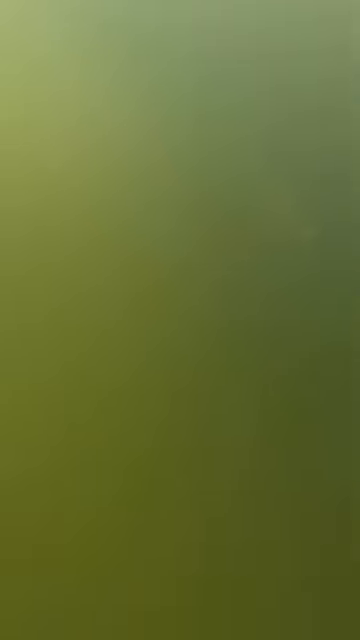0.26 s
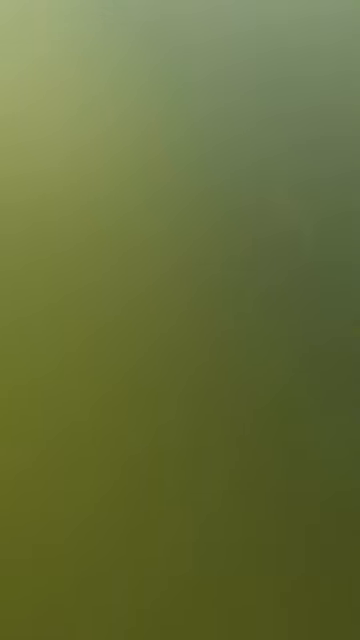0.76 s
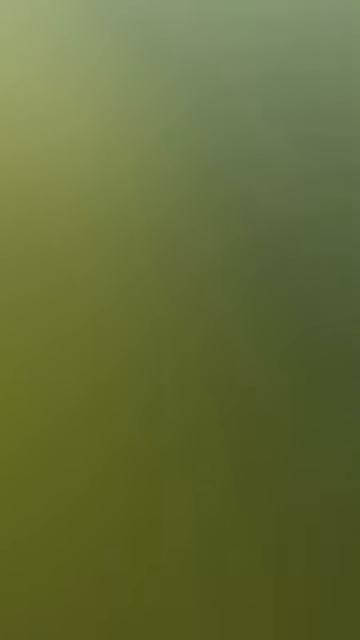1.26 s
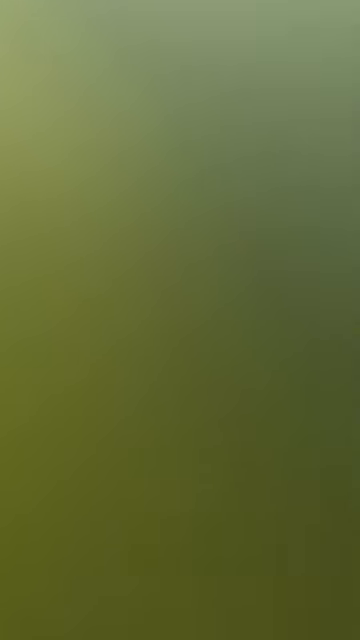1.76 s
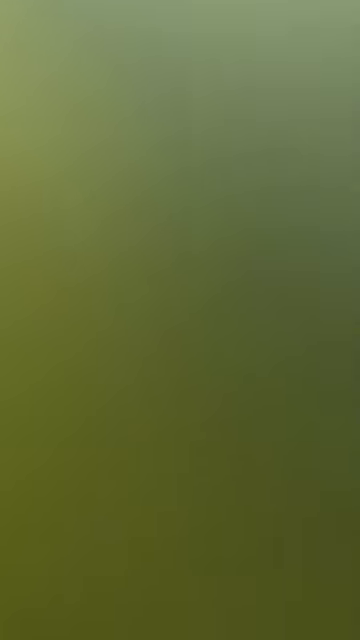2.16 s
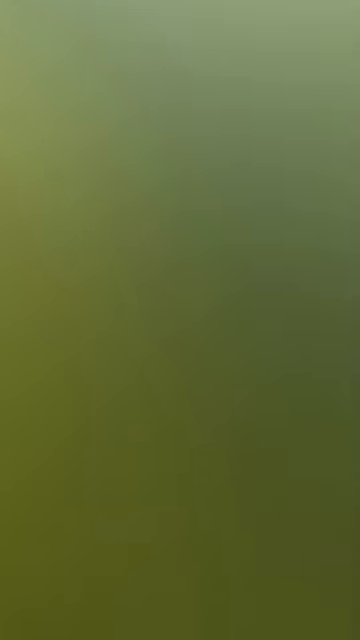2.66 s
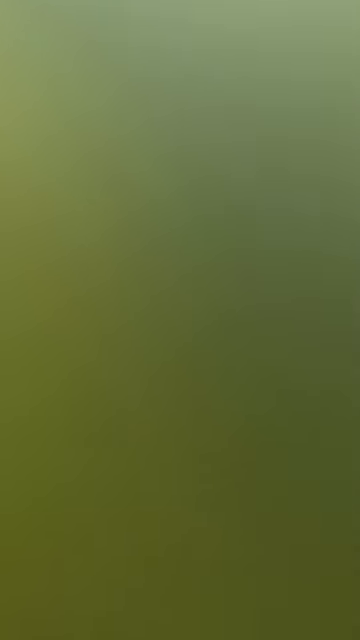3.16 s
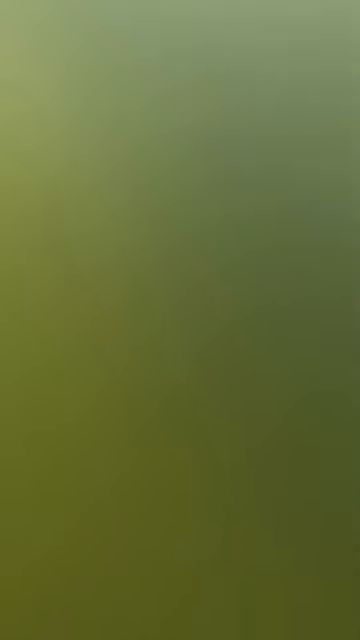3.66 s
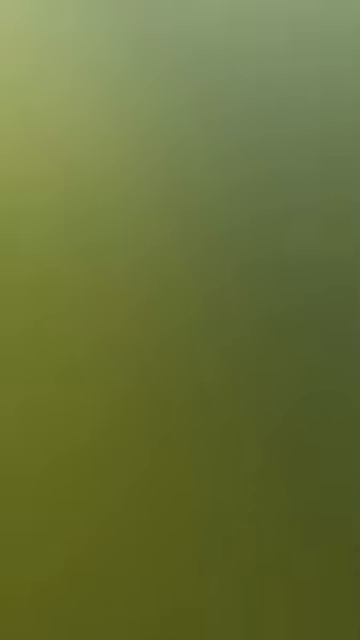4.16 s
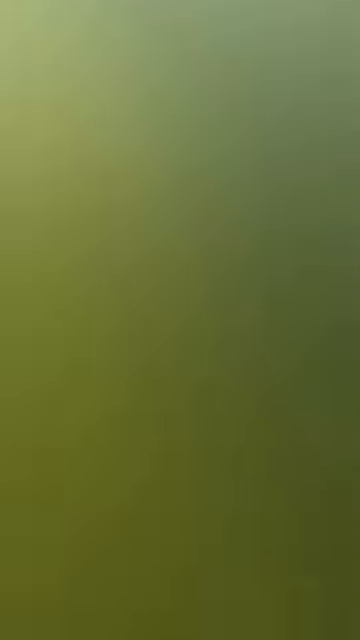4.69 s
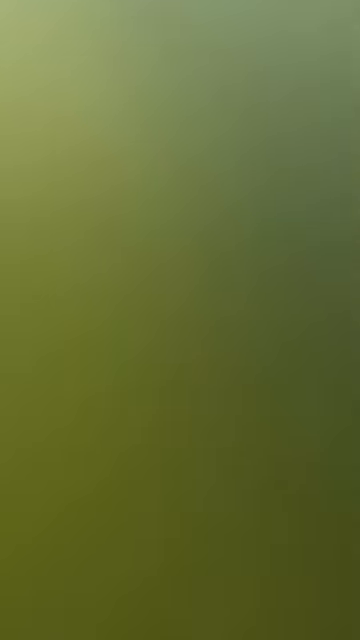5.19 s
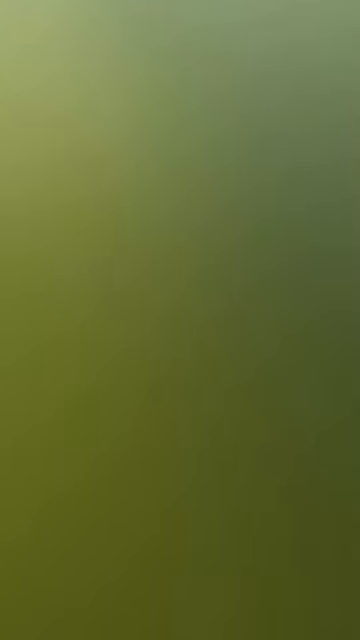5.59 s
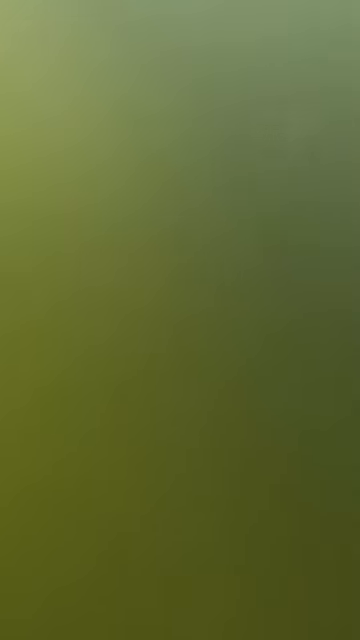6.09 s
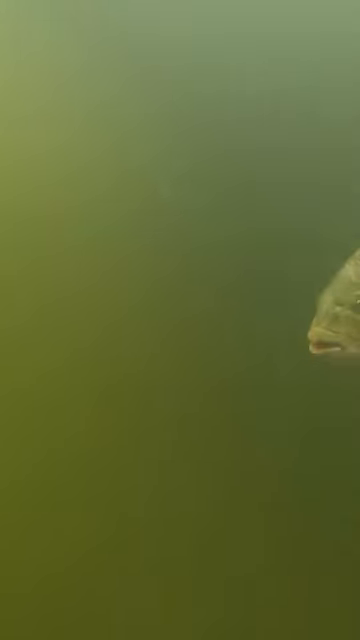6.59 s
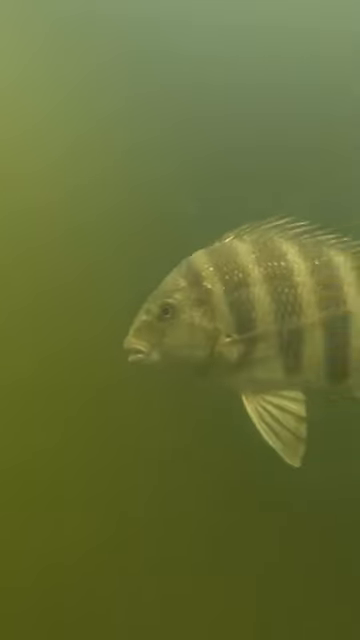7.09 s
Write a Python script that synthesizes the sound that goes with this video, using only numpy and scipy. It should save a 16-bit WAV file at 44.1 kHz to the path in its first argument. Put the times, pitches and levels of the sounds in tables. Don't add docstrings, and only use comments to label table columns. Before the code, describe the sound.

A sealed housing hangs in murky water, heard from within. Throughout there is soft broadband hiss, fine distant crackle, dull low rumble, a barely audible high whine and a hollow hum near 410 Hz that wavers and weakens. Quick knocks and a sharp snap open the scene; a strong hollow knock lands at 0.5 s. Faint, rough, pulsing fish grunts come at about 0.35, 0.8, 1.6 and 2.25 s. More snaps at 1.05 and 1.2 s, and a firm knock at 1.36 s. From 1.9 to 2.1 s the mount gives loud dry pops and brief rubbing as slow pressure surges, then ticks. At 2.45-2.5 s a soft thump bounces with knocks and a pop. Smaller knocks, tiny fizzes and ticks thin out after 3 s. Clearer snaps return around 4.8 and 5.0 s, a knock at 5.3 s, then sparse snaps at 6.2, 6.8 and 7.15 s over the quiet hum until the end.

```python
import sys
import numpy as np
from scipy import signal
from scipy.fft import rfft, irfft, next_fast_len
from scipy.io import wavfile
from scipy.ndimage import uniform_filter1d

SR = 44100
rng = np.random.default_rng(int(sys.argv[2]) if len(sys.argv) > 2 else 0)


def boost_factor(decibels):
    exponent = np.asarray(decibels, float) / 20
    return 10 ** exponent


def transcribe(signal):
    frames = np.atleast_2d(signal).T
    limited = np.clip(frames, -1, 1)
    pcm = np.round(limited * 32767).astype(np.int16)
    wavfile.write(sys.argv[1], SR, pcm)


N = 323694

# (frequency [Hz], level [dB])
SNAP_SPECTRUM = [(900, -49), (2200, -8.5), (3200, -8.5), (3900, -7.5), (5600, -6.5), (7200, -6.5),
                 (8400, -14.5), (11500, -23), (14800, -31.5)]
# (frequency [Hz], phase [rad])
PORT_LEAD = [(0, 0), (520, 0.0), (780, -1.63), (1460, -0.79), (1720, -0.84), (2240, -1.12), (2760, -1.1),
             (3010, -0.94), (3530, -0.41), (4050, -0.7), (4390, -0.5), (4820, -0.73), (6370, 0.28),
             (14900, 0.18)]
# (frequency [Hz], level [dB])
PORT_TILT = [(60, -1.5), (110, 1), (200, -6), (380, 2), (690, -5), (1280, 2), (2350, 2.5), (4330, -2.5),
             (7980, 0.5), (14700, 2.5)]


def evened(x):
    return x / np.sqrt(np.mean(x ** 2) + 1e-20)


def read(points, hz):
    f, value = np.transpose(points)
    return np.interp(np.log(hz + 1), np.log(f + 1), value)


def add(mix, s, sound):
    part = mix[round(s * SR):][:len(sound)]
    part += sound[:len(part)]


def band(x, low, high, order=2):
    return signal.sosfilt(signal.butter(order, [low, high], "band", fs=SR, output="sos"), x)


def resonate(x, hz, width):
    return signal.lfilter(*signal.iirpeak(hz, hz / max(width, 1), SR), x)


def ring(db, hz, t60, rise):
    t = np.arange(SR // 4) / SR
    decay = boost_factor(-60 * t / np.clip(t60, .004, .6))
    shape = decay * (1 - np.exp(-t / max(rise, 1e-4))) ** 2
    return boost_factor(db) * shape / shape.max() * np.sin(2 * np.pi * hz * t)


def causal(points):
    log_gain = read(points, np.fft.rfftfreq(2048, 1 / SR)) * np.log(10) / 20
    circle = np.r_[log_gain, log_gain[-2:0:-1]]
    return np.fft.ifft(np.exp(np.conj(signal.hilbert(circle)))).real[:1024]


def ports(x):
    size = next_fast_len(N)
    hz = np.fft.rfftfreq(size, 1 / SR)
    half = boost_factor(read(PORT_TILT, hz) / 2) * np.exp(.5j * 0.95 * read(PORT_LEAD, hz))
    return irfft(rfft(x, size) * np.array([half, 1 / half]), size)[:, :N]


def wash(magnitude, patchy_db, size):
    # (frequency [Hz], coherence [0-1])
    likeness = [(60, 0.56), (130, 0.58), (290, 0.56), (630, 0.52), (1390, 0.79), (3050, 0.44), (5000, 0.91),
                (6700, 0.89), (14700, 0.78)]
    hop = size // 4
    hz = np.fft.rfftfreq(size, 1 / SR)
    a, b, c, d, patches = rng.standard_normal((N // hop + 5, len(hz), 5)).T
    patches = uniform_filter1d(patches, size=3000 // hop, axis=1)
    patches = evened(uniform_filter1d(patches, size=size // 100, axis=0))
    same = np.clip(read(likeness, hz), 0, 1)[:, None]
    left, other = a + 1j * b, c + 1j * d
    half = (boost_factor(read(PORT_TILT, hz) / 2) * np.exp(.5j * read(PORT_LEAD, hz)))[:, None]
    z = np.array([left * half, (same * left + np.sqrt(1 - same ** 2) * other) / half])
    z *= magnitude(hz)[:, None] * boost_factor(patchy_db * patches.clip(-2, 2))
    return signal.istft(z, nperseg=size, noverlap=size - hop)[1][:, :N]


def hiss():
    # (frequency [Hz], density [dB per Hz])
    water = [(900, -10), (1700, -8), (2500, -8), (4100, -15), (4800, -15.5), (6500, -7), (7600, -14),
             (8100, -19.5), (9300, -20.5), (11200, -26), (12600, -25), (13100, -30), (14600, -31.5),
             (15300, -36)]
    # (frequency [Hz], width [Hz], level [dB])
    shell_modes = [
        (1410, 200, -3),
        (2028, 500, -1),
        (3160, 670, -2.5),
        (4500, 90, -5),
        (5434, 950, -3),
        (8700, 120, -16),
        (10500, 140, -26),
    ]

    def colour(hz):
        peaks = sum(boost_factor(db) ** 2 / (1 + (2 * (hz - f) / w) ** 2) ** 2 for f, w, db in shell_modes)
        return np.sqrt(boost_factor(read(water, hz)) ** 2 + peaks) * (hz > 800)
    return boost_factor(-67.5) * evened(wash(colour, patchy_db=1.83, size=1024))


def murk():
    # (frequency [Hz], density [dB per Hz])
    low_water = [(8.8, -29), (15, 0.5), (36, -9), (92, -23), (158, -14), (281, -20.5), (342, -18.5),
                 (409, -12.5), (536, -27.5), (903, -33.5), (1100, -49), (1430, -66), (2420, -120)]
    low = wash(lambda hz: boost_factor(read(low_water, hz)) * (hz > 12) * (hz < 1100), patchy_db=3.5, size=4096)
    upper = band(low, 500, 1100, order=4)
    return boost_factor(-75) * low / np.std(upper)


def sway():
    # (time [s], peak level [dB])
    surge_table = [(0.0, -50), (0.35, -47), (0.6, -44.5), (1.12, -44), (1.36, -41), (1.76, -40),
                   (2.06, -34.5), (2.3, -40), (2.45, -42), (3.1, -47), (3.68, -43), (4.66, -45),
                   (5.42, -47), (6.33, -46), (6.0, -46), (6.9, -45), (7.11, -47.5)]
    rise_db_per_s, fall_db_per_s, calm_db = 50, 75, -70
    noise = rng.standard_normal((3, N + SR))
    drift = evened(band(noise[:2], 2.5, 9.0)[:, SR:])
    eddies = evened(band(noise[2], 15.0, 45.0)[SR:])
    t = np.arange(N) / SR
    surges = [db - np.maximum(rise_db_per_s * (s - t), fall_db_per_s * (t - s)) for s, db in surge_table]
    strength = boost_factor(np.maximum(np.max(surges, axis=0), calm_db))
    apart = 0.063 * np.array([drift[1], -drift[1]])
    return strength * (drift[0] + boost_factor(-18.5) * eddies + apart)


def hum():
    # (time [s], level [dB])
    work = [(0.0, -56), (0.57, -61), (1.1, -63), (1.25, -63), (1.4, -58), (2.23, -62.5), (2.66, -63),
            (3.07, -63), (3.33, -64), (3.78, -60), (4.05, -62), (4.6, -63), (5.03, -67), (5.3, -62),
            (5.64, -65), (5.95, -71), (6.45, -71), (6.64, -66), (6.99, -65), (7.34, -63)]
    t = np.arange(N) / SR
    hits = rng.random((2, N)) < 90 / SR
    strength = .14 + hits * boost_factor(3.0 * rng.exponential(1, (2, N)).clip(0, 4))
    nudges = rng.standard_normal((2, N)) * strength
    wander = uniform_filter1d(rng.standard_normal(N), size=1500)
    wander = evened(uniform_filter1d(wander, size=1500))
    held = np.sqrt(2) * np.sin(2 * np.pi * np.cumsum(408 + 7.0 * wander) / SR)
    air = evened(resonate(resonate(nudges[0], 411.1, 22), 375, 150)) + 0.88 * held
    case = resonate(resonate(nudges[1], 162.7, 45), 189, 120)
    work_db = np.interp(t, *np.transpose(work))
    case_db = -61.5 + 0.64 * (work_db - work_db.mean()) - 1.55 * t
    return boost_factor(work_db - .6) * air + boost_factor(case_db) * evened(case)


def whine():
    # (frequency [Hz], rms level [dB])
    tones = [
        (4495.6, -91),
        (8991, -97.5),
    ]
    t = np.arange(N) / SR
    pulsing = 1 + 1.3 * np.cos(2 * np.pi * 29.97 * t)
    return pulsing * sum(boost_factor(db) * np.sqrt(2) * np.sin(2 * np.pi * (hz * t + rng.random()))
                         for hz, db in tones)


def crackle():
    size = boost_factor(4 * rng.exponential(1, N).clip(0, 2.5)) * (rng.random(N) < 70 / SR)
    t = np.arange(400) / SR
    spread = signal.oaconvolve(size, boost_factor(-60 * t / 0.014))[:N] * rng.standard_normal(N)
    coloured = signal.oaconvolve(spread, causal(SNAP_SPECTRUM))[:N]
    return boost_factor(-79.5) * evened(resonate(coloured, 5000, 6000))


def knocks():
    # (time [s], peak level [dB], frequency [Hz], t60 [s])
    air_knocks = [(0.028, -45, 406, 0.17), (0.043, -35, 410, 0.08), (0.073, -36, 415, 0.17),
                  (0.5053, -26, 401, 0.099), (0.689, -46, 395, 0.12), (0.747, -40.5, 416, 0.073),
                  (1.292, -40, 396, 0.11), (1.319, -34.5, 400, 0.17), (1.361, -27.5, 411.8, 0.16),
                  (1.492, -45.5, 405, 0.12), (2.4607, -31, 410, 0.05), (2.716, -48.5, 415, 0.16),
                  (2.749, -46.5, 394, 0.058), (2.902, -48, 381, 0.072), (2.97, -52, 404, 0.056),
                  (3.139, -47, 393, 0.056), (3.465, -45.5, 409, 0.071), (3.51, -46, 407.6, 0.15),
                  (3.714, -45, 400, 0.074), (3.815, -45, 399, 0.13), (3.982, -44.5, 425, 0.15),
                  (4.333, -53, 388, 0.11), (5.18, -43, 403, 0.11), (5.23, -51.5, 397, 0.15),
                  (5.31, -36, 395.3, 0.15), (6.152, -49.5, 410, 0.067), (6.21, -53, 418, 0.1),
                  (6.987, -54, 408, 0.14), (7.169, -51, 409, 0.12), (2.873, -54, 390, .1),
                  (3.02, -53, 390, .1), (3.065, -54, 390, .12), (3.276, -51, 412, .15),
                  (3.548, -53, 406, .1), (3.783, -51, 404, .1), (3.938, -51, 404, .1),
                  (4.452, -57, 415, .1), (4.489, -55, 404, .1), (4.586, -54, 395, .1),
                  (4.931, -53, 417, .12), (5.265, -51, 406, .08), (5.647, -54, 415, .1),
                  (5.694, -57, 415, .1), (5.736, -55, 420, .1), (6.271, -56, 406, .1),
                  (6.504, -56, 406, .15), (6.6, -58, 420, .1), (6.828, -52, 417, .12),
                  (7.207, -53, 405, .1), (7.264, -50, 415, .12)]
    # (time [s], peak level [dB])
    soft_nudges = [(0.2, -48), (0.826, -43.5), (0.31, -51), (0.972, -52), (0.997, -52), (1.108, -51),
                   (2.275, -53), (2.36, -56), (4.145, -51), (4.67, -52), (4.765, -56), (4.85, -57),
                   (1.645, -46.5), (2.042, -54), (3.23, -53.5), (3.619, -47), (4.208, -47.5), (5.123, -52),
                   (7.307, -52)]
    # (time [s], peak level [dB], frequency [Hz], t60 [s])
    case_thuds = [(.05, -50, 155, .15), (0.5, -30.5, 201, 0.047), (0.76, -51, 168.5, 0.13),
                  (2.529, -47, 102, 0.12), (2.587, -37, 151, 0.088), (2.716, -37, 146.5, 0.064),
                  (2.786, -48, 153, 0.1), (3.376, -54.5, 160, 0.1), (3.5, -56.5, 162, 0.16),
                  (4.042, -44.5, 158, 0.082), (4.154, -53, 159, 0.078), (4.291, -45.5, 140, 0.052),
                  (5.178, -55, 205, 0.057), (5.305, -43.5, 230, 0.09)]
    # (time [s], peak level [dB], frequency [Hz], t60 [s])
    further_rings = [(.04, -43, 328, 0.068), (.505, -36, 287, 0.068), (1.35, -57, 85, 0.12),
                     (2.01, -48, 60, 0.13), (2.452, -38.5, 150, .05), (2.471, -57, 720, 0.07),
                     (2.4705, -24, 420, 0.075), (2.4907, -32.5, 375, 0.08), (3.985, -46.5, 316, 0.05),
                     (4.29, -54, 83, .12), (5.311, -42.5, 333, 0.09), (5.33, -55, 468, 0.1)]
    out = np.zeros(N)
    for s, db, hz, t60 in air_knocks + [(*row, 409, 0.33) for row in soft_nudges]:
        add(out, s - .003, ring(db, hz, t60, 0.0041))
    for s, db, hz, t60 in case_thuds + further_rings:
        add(out, s, ring(db, hz, t60, .0025 + .45 / hz))
    return out


def snaps():
    # (time [s], peak level [dB], brightest frequency [Hz],
    # lid ring re snap [dB], wall ring re snap [dB])
    near_snaps = [(0.0584, -32, 7600, -19, -15), (0.22, -42.5, 7200, -3.5, -8),
                  (0.5198, -42, 7060, -16, -22), (0.658, -48.5, 3550, -1.5, -3.5),
                  (1.055, -45.5, 4400, -8, -4), (1.1868, -37, 5540, -2.5, -7.5),
                  (1.3541, -49, 6900, -12, -22), (1.417, -41, 4150, -3, -4),
                  (1.7125, -43.5, 7400, -17, -16), (1.779, -47, 6930, -31, -24),
                  (1.9824, -46, 4560, -11, -5), (2.234, -41, 4700, 0, -15), (2.3254, -38, 3940, -11, -12.5),
                  (3.0021, -44, 6970, -10, -20), (4.772, -49, 4680, -19, -13),
                  (4.8097, -41, 5800, -11, -10.5), (5.022, -36, 3820, -9, -7),
                  (5.3487, -44.5, 6960, -28, -20), (5.6037, -50, 7030, -22, -13),
                  (6.183, -42, 7550, -11, -5), (6.251, -50, 7100, -22, -17), (6.658, -48.5, 5900, -23, -12),
                  (6.836, -46, 4990, 2, 5.5), (7.1517, -39, 6970, -9.5, -10.5)]
    # (time [s], peak level [dB])
    far_snaps = [(0.0922, -51), (1.6671, -55), (1.8087, -53), (2.0336, -48.5), (2.3594, -56),
                 (2.7603, -56.5), (2.9194, -60), (4.03, -59), (4.9533, -53), (5.217, -50), (5.3644, -57),
                 (5.874, -53.5), (6.9894, -61), (7.1931, -59)]
    far_hz, far_lid_db, far_wall_db = 5370, -18, -13
    out, apart = np.zeros(N), np.zeros(N)
    t, colour = np.arange(2048) / SR, causal(SNAP_SPECTRUM)
    treble = signal.butter(2, 8500, "high", fs=SR, output="sos")
    rows = sorted(near_snaps + [(*row, far_hz, far_lid_db, far_wall_db) for row in far_snaps])
    grits = rng.standard_normal((len(rows), 2, 2048))
    for (s, db, hz, lid_db, wall_db), grit in zip(rows, grits):
        length = 1.08 * (far_hz / hz) ** 0.35
        direct, echoes = boost_factor(-60 * t / (0.017 * length)), boost_factor(-60 * t / (0.18 * length))
        rough = grit * (direct + 0.078 * echoes) * np.minimum(t / .0016, 1)
        burst, other = signal.fftconvolve(rough, colour[None])[:, :2048]
        shock = grit[0] * (direct + 0.085 * echoes) * np.minimum(t / 0.0019, 1)

        lid = evened(resonate(resonate(shock, 1515, 250), 1510, 600))
        lid = resonate(lid + 4.5 * ring(0, 1437.0, 0.037 * length, 0.0018)[:2048], 1530, 900)
        wall = resonate(resonate(shock, 2020, 170), 2010, 600)
        wall = wall + 0.72 * resonate(resonate(shock, 2730, 200), 2970, 600)

        top_gain = min((hz / 5100) ** 2.5, 1.4)
        burst = burst + (top_gain - 1) * signal.sosfiltfilt(treble, burst)
        bright = burst + 2.04 * (hz / 5500) ** 2 * resonate(burst, hz, 820)
        for part, part_db in [(bright, 0), (lid, lid_db), (wall, wall_db + 0.5)]:
            add(out, s, boost_factor(db + part_db) * part / abs(signal.hilbert(part)).max())
        add(apart, s, boost_factor(db - 12) * other / abs(other).max())
    return ports(out) + apart * np.array([[1], [-1]])


def ticks():
    # (time [s], peak level [dB], frequency [Hz])
    slip_table = [(.067, -54, 1420), (1.119, -57, 1450), (1.3, -62, 1430), (1.362, -58, 1400),
                  (2.134, -54, 1350), (2.146, -54, 1370), (2.174, -54, 1350), (2.209, -55, 1400),
                  (2.2425, -52, 1420), (2.291, -49, 1420), (2.3, -52, 1450), (2.898, -61, 1440),
                  (2.911, -59, 1430), (2.923, -61, 1420), (2.937, -62, 1420), (3.046, -63, 1430),
                  (3.072, -64, 1470), (3.112, -58, 1380), (3.129, -55, 1420), (3.139, -57, 1430),
                  (3.157, -61, 1430), (3.454, -63, 1480), (3.557, -57, 1460), (3.704, -63, 1400),
                  (3.794, -60, 1420), (3.964, -60, 1470), (4.605, -63, 1390), (4.705, -60, 2740),
                  (7.164, -56, 1430), (7.257, -60, 1400), (7.276, -60, 1380), (7.317, -58, 1500)]
    out = np.zeros(N)
    for s, db, hz in slip_table:
        add(out, s, ring(db, hz, .038, .0018) + ring(db - 9, 1.42 * hz, .03, .001))
    return out


def grunts():
    # (start [s], end [s], level [dB], pulse rate [1/s])
    calls = [
        (0.339, .47, -75, 81),
        (0.774, 1.0, -73, 77),
        (1.62, 1.86, -73.5, 66),
        (2.241, 2.44, -75.5, 79),
    ]
    out = np.zeros(N)
    for start, end, db, per_s in calls:
        jitter, size, pitch = rng.standard_normal((40, 3)).T
        times = start - .015 + np.cumsum((1 + .2 * jitter) / per_s)
        for s, size_db, hz in zip(times, 2.5 * size, 780 * (1 + .06 * pitch)):
            if s < end:
                swell_db = db + size_db - 7 * (2 * (s - start) / (end - start) - 1) ** 4
                upper = ring(swell_db + 9, hz, 0.048, .003)
                lower = ring(swell_db + 6.5, 0.767 * hz, 0.032, 0.0033)
                add(out, s, upper + lower)
    return out


def taps():
    # (time [s], peak level [dB], frequency [Hz])
    tap_table = [(0.5015, -48, 790), (1.417, -51.5, 760), (1.965, -54, 690), (1.973, -54.5, 830),
                 (2.033, -55, 670), (2.057, -58, 570), (2.446, -54, 556), (2.447, -55, 830),
                 (2.492, -60, 760), (3.714, -60, 614), (3.813, -59, 570), (3.979, -59, 830),
                 (5.189, -59, 619), (5.311, -61, 568)]
    t60 = .031
    out = np.zeros(N)
    for s, db, hz in tap_table:
        add(out, s, ring(db + 1, hz, t60, 0.0011) + ring(db - 7.0, 1.22 * hz, t60, 0.00073))
    return out


def fizz():
    # (time [s], peak level [dB])
    bubbles = [
        (1.338, -70),
        (2.3675, -65),
        (2.738, -70),
        (2.9108, -69),
        (2.9417, -67),
        (4.0128, -76),
        (4.0277, -66),
        (5.5927, -68),
        (7.3108, -70),
    ]
    out, t = np.zeros((2, N)), np.arange(1024) / SR
    treble = signal.butter(4, 9800, "high", fs=SR, output="sos")
    for (s, db), grit in zip(bubbles, rng.standard_normal((len(bubbles), 2, 1024))):
        envelope = boost_factor(db - 1 - 60 * t / .025) * np.minimum(t / .001, 1)
        burst = signal.sosfilt(treble, grit) * envelope
        add(out[0], s, burst[0] + .4 * burst[1])
        add(out[1], s, burst[0] - .4 * burst[1])
    return out


def rub():
    # (start [s], length [s], level [dB])
    stroke_table = [(1.36, .035, -69), (1.43, .035, -65), (1.98, .01, -62), (2.017, .012, -54.5),
                    (2.04, .03, -60), (2.138, .04, -67), (2.19, 0.075, -68), (2.284, 0.022, -62),
                    (2.471, 0.039, -61), (3.805, .02, -69), (3.97, .022, -70)]
    edge_db_per_s, creep_db = 901, -78
    slips = rng.standard_normal(N) * (.4 + (rng.random(N) < 700 / SR) * 3.0)
    t = np.arange(N) / SR
    strokes = np.zeros(N)
    for s, length, db in stroke_table:
        outside = np.maximum(np.maximum(s - t, t - s - length), 0)
        strokes += boost_factor(db - edge_db_per_s * outside)
    lid = resonate(resonate(slips, 1450, 310), 1380, 600)
    wall = resonate(resonate(slips, 1920, 260), 1990, 500)
    return np.maximum(strokes, boost_factor(creep_db)) * evened(lid + 0.6 * wall)


def pops():
    # (time [s], peak level [dB], frequency [Hz])
    pop_table = [(1.9056, -47, 1240), (1.9626, -33, 1320), (1.9704, -31.5, 1300), (2.0349, -25.5, 1390),
                 (2.0556, -29.5, 1340), (2.2484, -42, 1370), (2.4448, -33.5, 1350), (2.489, -41.5, 1320),
                 (3.5735, -51.5, 1280), (4.369, -59, 1340), (4.801, -52, 1380), (6.2751, -59, 1380),
                 (6.6787, -49, 1340), (6.7007, -61, 1400), (7.1744, -55, 1380)]
    out = np.zeros(N)
    for s, db, hz in pop_table:
        contact = max(0.0037 - .00014 * (db + 29.5), .001)
        t = np.arange(0, contact, 1 / SR)
        tone = np.sin(2 * np.pi * hz * 1.089 * t) + 0.035 * np.sin(2 * np.pi * 3050 * t)
        packet = boost_factor(db) * np.hanning(len(t)) * tone
        for delay, echo_db in [(-.0008, 0), (.0026, -14), (.0065, -22), (.011, -33)]:
            add(out, s + delay, boost_factor(echo_db) * packet)
    return out


def thump():
    # (time [s], level [dB], contact [s])
    bounces = [
        (2.4645, -12.8, 0.0068),
        (2.4812, -16.5, 0.0034),
        (2.494, -15, 0.0078),
        (2.504, -31, 0.007),
        (2.512, -24, .006),
    ]
    # (frequency [Hz], level [dB], t60 [s])
    case_modes = [
        (69, -14.5, .12),
        (121, 3, 0.065),
        (168.6, -2.5, 0.14),
        (202.2, 1.0, 0.075),
        (290, -10, .04),
    ]
    push, t = np.zeros(N), np.arange(SR // 4) / SR
    for s, db, contact in bounces:
        add(push, s, boost_factor(db) * np.hanning(round(contact * SR)))
    modes = sum(boost_factor(db - 60 * t / t60) * np.cos(2 * np.pi * hz * t) for hz, db, t60 in case_modes)
    held = np.clip((2.525 - np.arange(N) / SR) / 0.013, .12, 1)
    return boost_factor(-43.5) * signal.oaconvolve(push, modes)[:N] * held


def scene():
    shell = ports(hum() + crackle() + ticks() + grunts() + taps() + rub() + pops()) + snaps()
    rocking = (knocks() + thump()) * boost_factor([[.4], [-.4]])
    return shell + rocking + hiss() + murk() + sway() + whine() + fizz()


def band_limit(x):
    return signal.sosfilt(signal.butter(12, 15310, fs=SR, output="sos"), x)


def record(dry):
    both = np.array([dry[0] + dry[1], dry[0] - dry[1]]) / 2
    hz, _, z = signal.stft(both, SR, nperseg=2048, noverlap=1024, window="cosine")
    power = uniform_filter1d(abs(z[0]) ** 2, size=4, axis=0)
    wide = uniform_filter1d(abs(z[1]) ** 2, size=24, axis=0)
    usual = np.median(power[(hz > 12800) & (hz < 13200)])
    busy = (1 + power[hz < 300].sum(0) / boost_factor(-73.5)) ** .15
    row_hz = hz[:, None]
    z[0] *= (power > boost_factor(4.5) * usual * busy) | (row_hz < 9000)
    z[1] *= (wide > boost_factor(5.8) * np.median(wide, axis=1)[:, None]) | (row_hz < 6200)
    z = z * (row_hz < 15300)
    mid, side = signal.istft(z, SR, nperseg=2048, noverlap=1024, window="cosine")[1][:, :N]
    return band_limit(np.array([mid + side, mid - side]))


dry = scene()
out = record(dry)
transcribe(out)
```